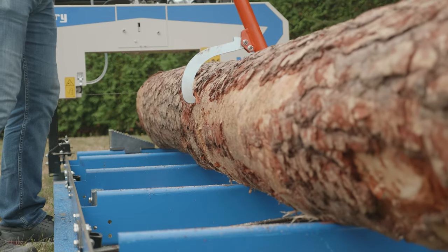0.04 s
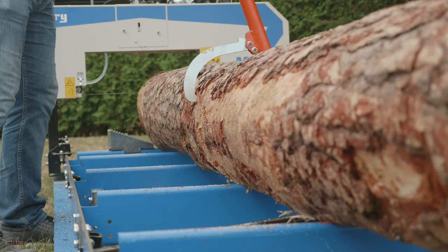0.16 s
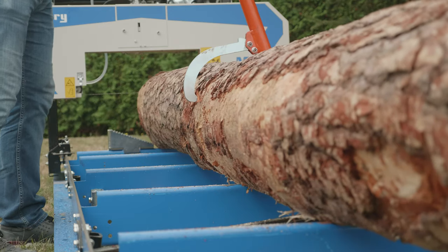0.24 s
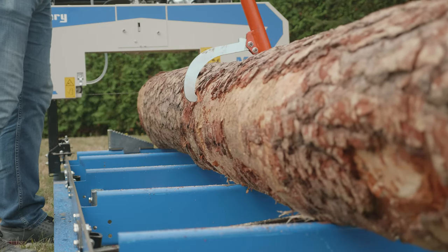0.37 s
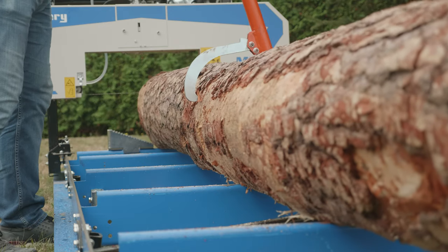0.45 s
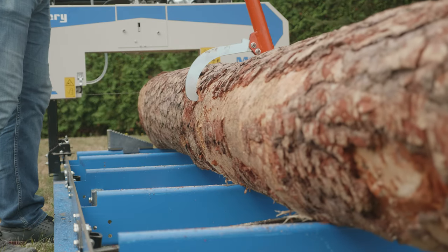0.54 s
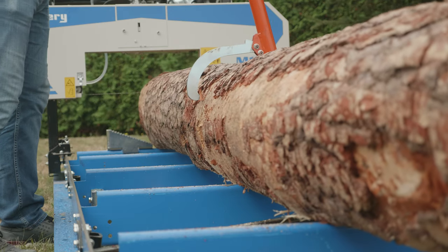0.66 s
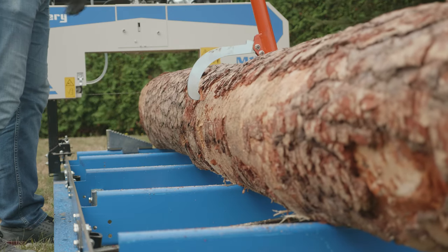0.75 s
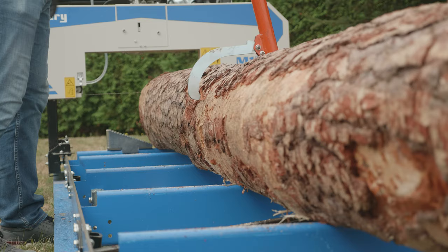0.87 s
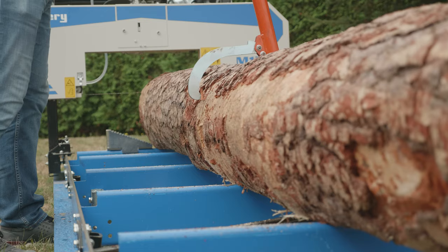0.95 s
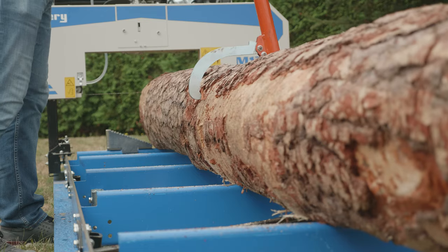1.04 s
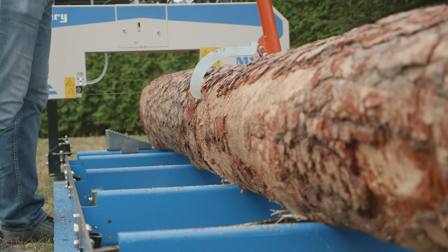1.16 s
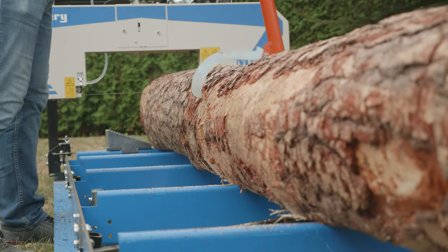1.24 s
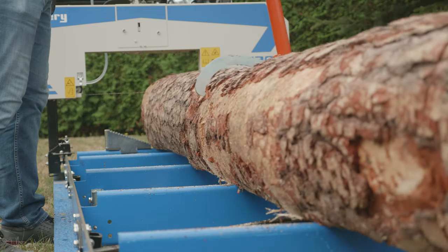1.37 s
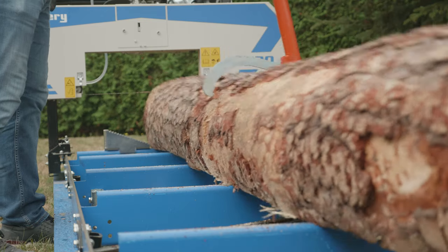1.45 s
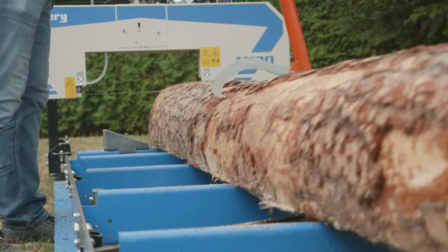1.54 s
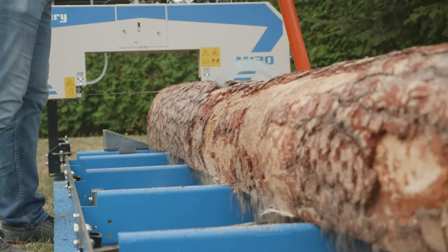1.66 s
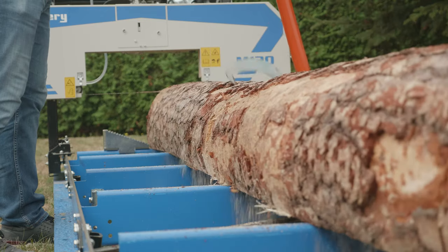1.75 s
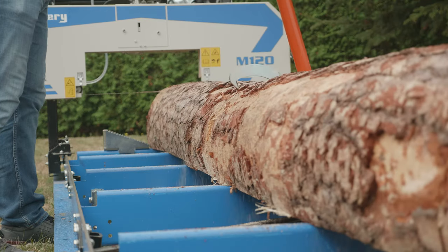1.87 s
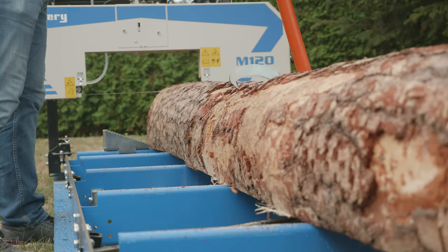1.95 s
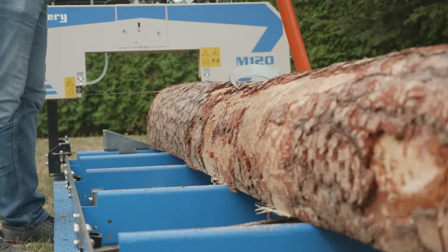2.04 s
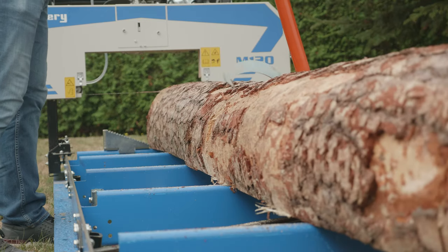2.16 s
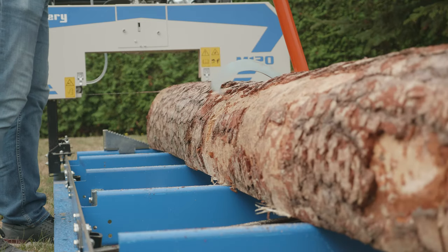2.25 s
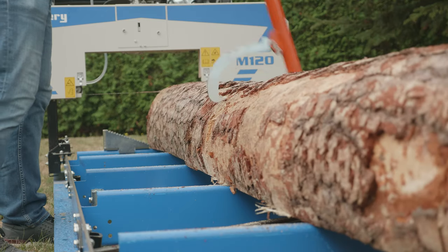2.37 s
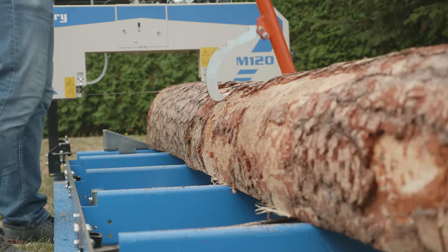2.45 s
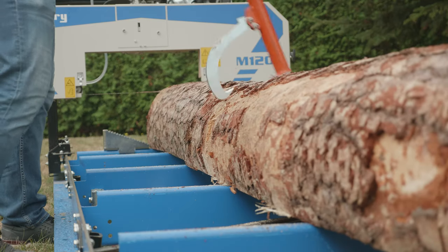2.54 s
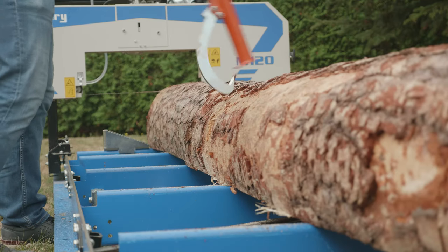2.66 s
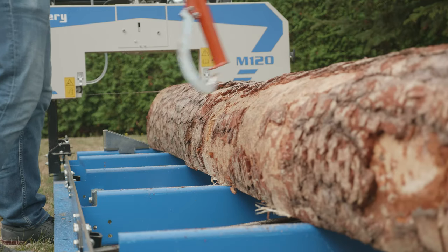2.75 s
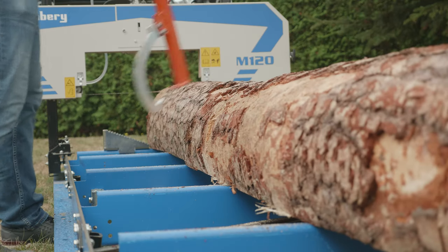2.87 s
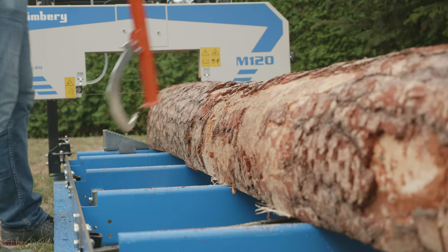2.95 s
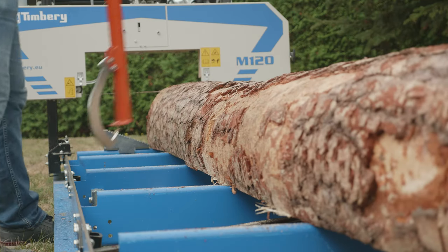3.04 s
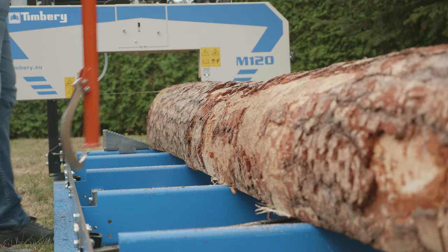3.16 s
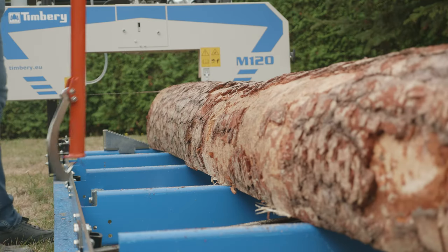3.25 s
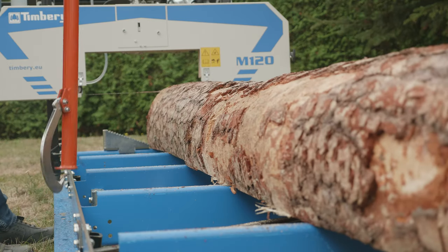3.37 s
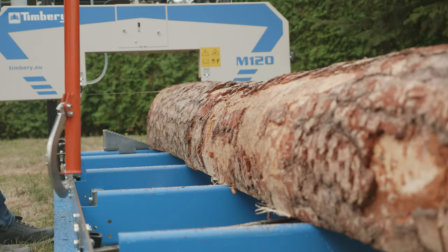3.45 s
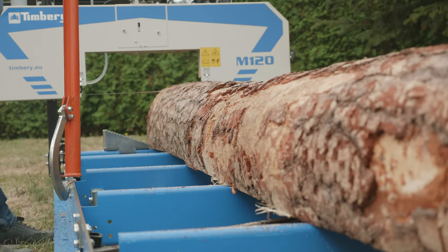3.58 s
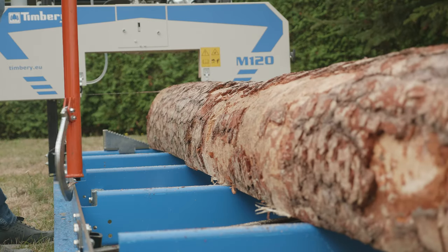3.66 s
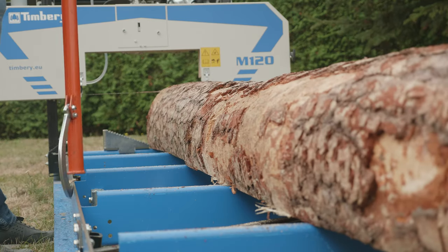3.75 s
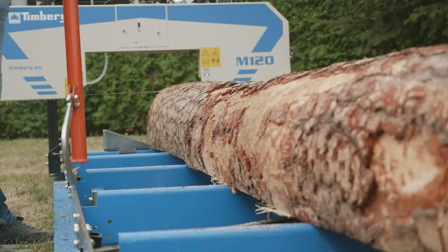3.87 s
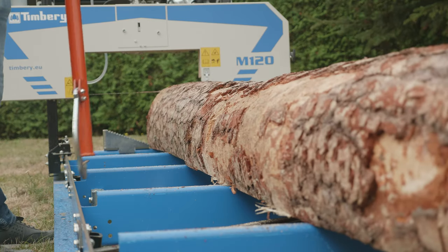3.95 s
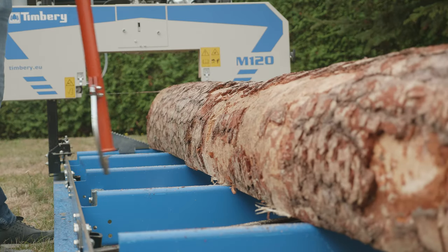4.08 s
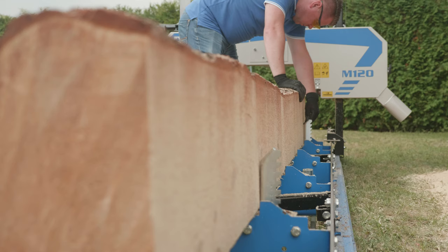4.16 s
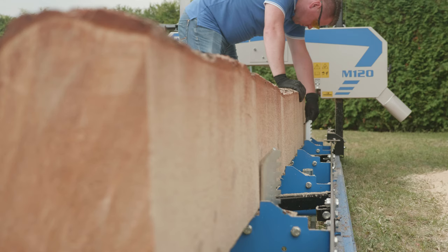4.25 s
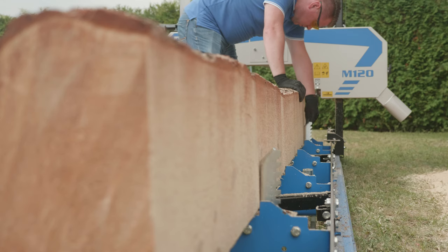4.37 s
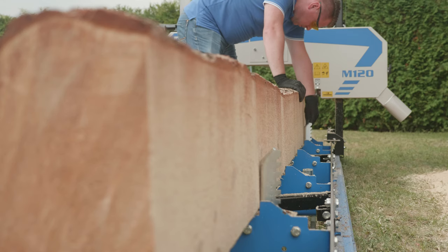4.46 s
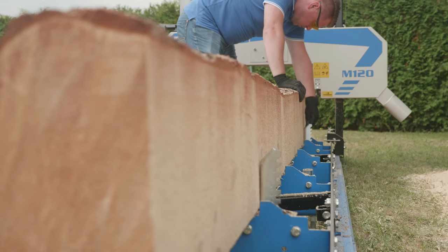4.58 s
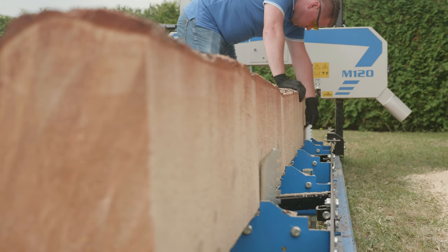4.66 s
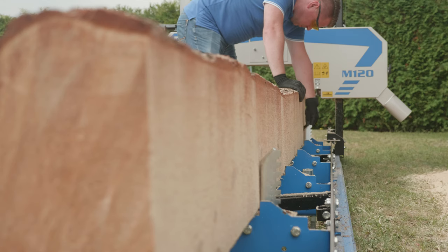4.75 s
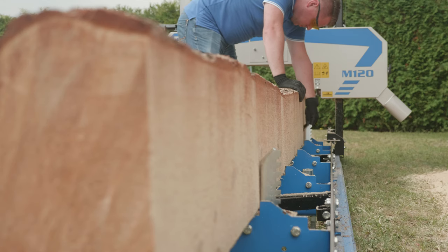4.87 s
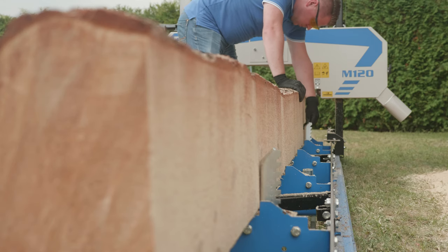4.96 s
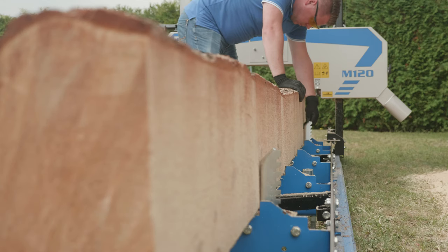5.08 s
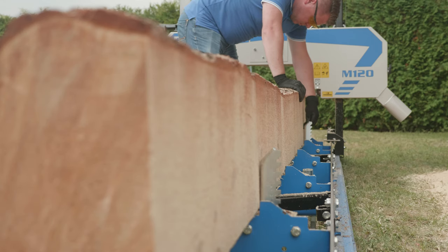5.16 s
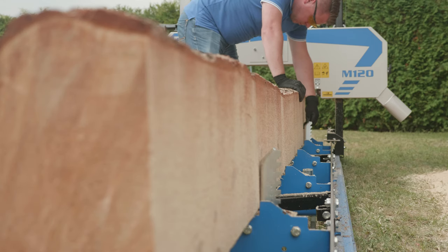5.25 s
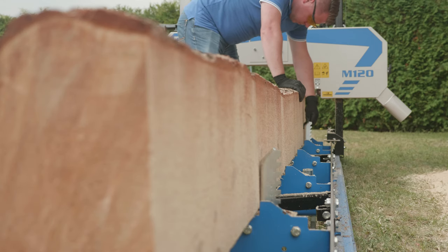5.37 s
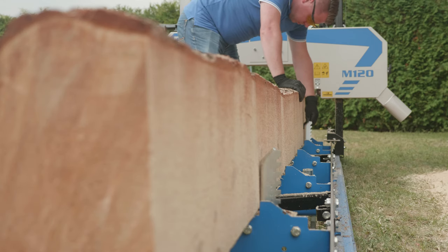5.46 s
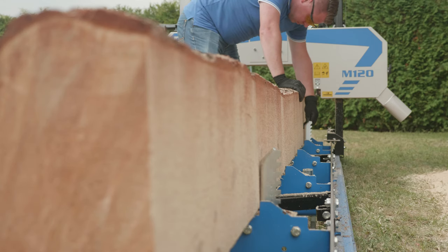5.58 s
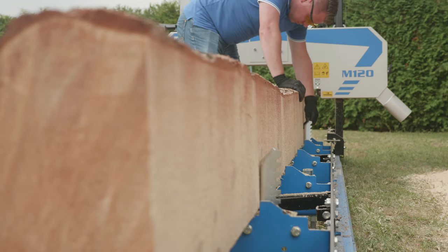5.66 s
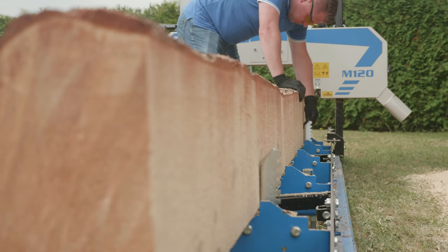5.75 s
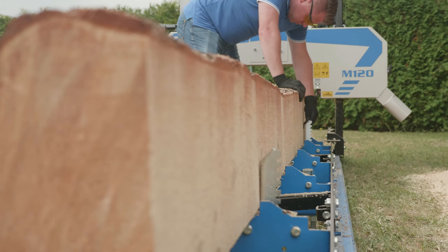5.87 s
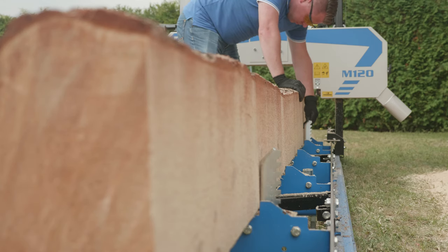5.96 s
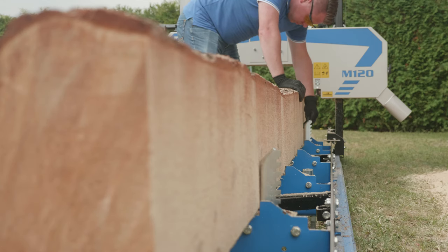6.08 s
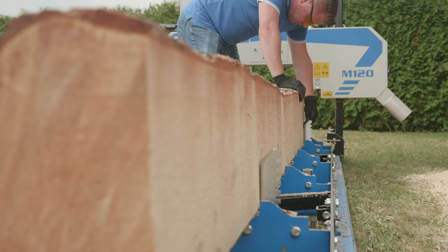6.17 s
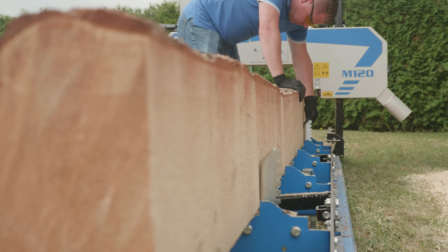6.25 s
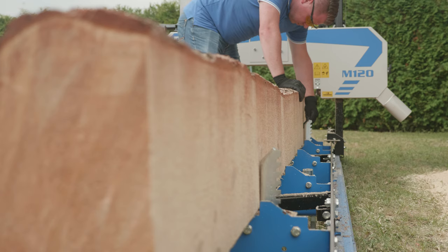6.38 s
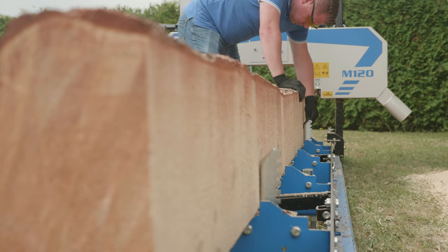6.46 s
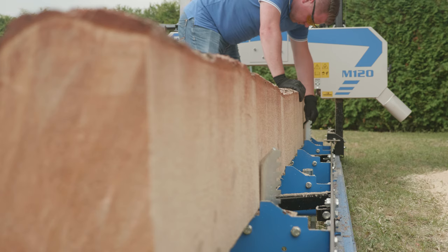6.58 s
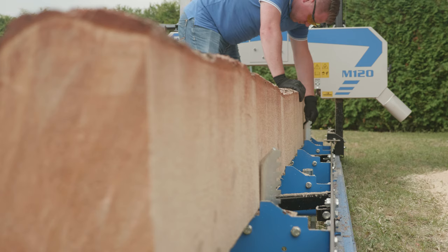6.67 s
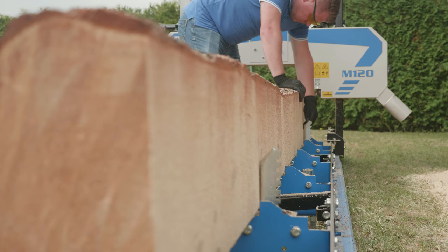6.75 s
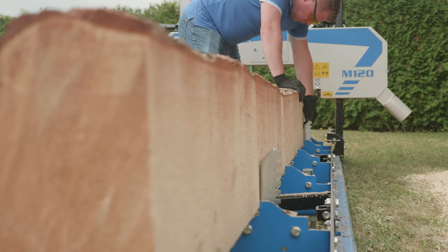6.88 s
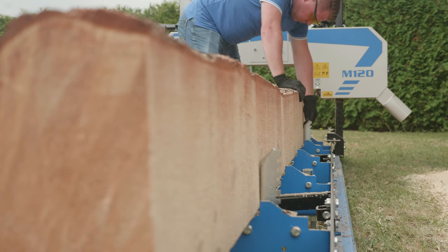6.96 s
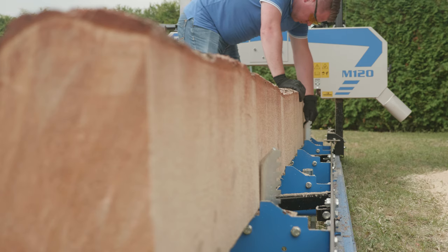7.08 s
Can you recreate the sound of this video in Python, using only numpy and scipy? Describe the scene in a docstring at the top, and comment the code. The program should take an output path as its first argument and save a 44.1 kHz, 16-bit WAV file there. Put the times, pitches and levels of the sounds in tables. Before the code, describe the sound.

Close outdoor microphone, quiet far traffic and leaves. After a second of calm a hook clinks, then a log slams onto steel beams with a loud bright clang, a short hum and grind and crumbs of bark pattering. The loose hook jingles high, the lever clanks onto a rail and rattles, then a clamp knocks softly against timber at uneven intervals, ending with one strong thud.

```python
"""Log turning on a sawmill bed

Outdoors at the steel bed, one microphone: the hinged hook of the turning lever clinks and rings, the log
drops on the cross beams and sheds bark, the lever is set on the rail, then a clamp is worked tight.
Struck parts are damped modes under a clatter of filtered noise; noise through beam modes hums when shaken.
Far off, shaped noise makes traffic and leaves; gliding sines make one bird call, and a slightly wavering
sine makes a faint whine in two spells.
"""
import sys
import numpy as np
from scipy import signal
from scipy.fft import rfft, irfft, next_fast_len
from scipy.io import wavfile
from scipy.ndimage import uniform_filter1d, map_coordinates

SR = 44100
rng = np.random.default_rng(int(sys.argv[2]) if len(sys.argv) > 2 else 0)


def generate_wav(signal):
    """Clip the signal to [-1, 1] and save it as 16-bit WAV at the path in sys.argv[1]."""
    frames = np.transpose(np.atleast_2d(signal))
    scaled = np.clip(frames, -1, 1) * 32767
    pcm = np.round(scaled).astype(np.int16)
    wavfile.write(sys.argv[1], SR, pcm)


N = 313992

# Far traffic and leaves, colour of each: f/Hz, density/dB per Hz (relative)
TRAFFIC_COLOUR = [(18, -38), (30, -2), (54, -0.5), (173, -11.5), (226, -8.5), (258, -15.5), (398, -26),
                  (500, -50), (650, -74.5), (1100, -120)]
LEAF_COLOUR = [(180, -32.5), (300, -4.5), (725, -12), (785, -8), (1040, -8), (1210, -6), (1330, -10),
               (4970, -24.5), (7000, -46), (9100, -62.5), (15400, -120)]
# Their course at the microphone: t/s, level/dB (the leaves before the gust is added)
TRAFFIC_COURSE = [(0, -51), (3.5, -53), (4.2, -47.5), (6.1, -48.5), (6.5, -43), (7.12, -42.5)]
LEAF_COURSE = [(0, -63.5), (3.5, -62.5), (4.2, -59.5), (6.1, -60.5), (6.5, -59), (7.12, -58)]
# Notes of the bird call: t/s, length/s, start f/Hz, end f/Hz, rms level at the crest/dB
BIRD_NOTES = [(0.332, 0.028, 4550, 3600, -67), (0.361, 0.018, 3700, 3530, -62.5)]
# Two spells of a faint far tone: t/s, length/s, rms level/dB
WHINE_SPELLS = [(4.593, 0.764, -63), (7.004, .3, -64)]
# The beams hum when shaken by hook, log or lever: t/s, shaking level/dB
BEAM_SHAKING = [(1.29, -50.5), (1.59, -48.5), (1.62, -33), (1.72, -24.5), (1.87, -29), (1.97, -39.5),
                (2.1, -41), (2.45, -48.5), (2.52, -42.5), (2.9, -43), (3.55, -59.5), (3.63, -43.5),
                (4.0, -46.5), (4.15, -68)]
# Bark shaken loose: t/s, level from which the patter fades/dB
BARK_SHOWERS = [(1.599, -55.5), (1.9, -74.5), (2.85, -69.5)]
# Heavier blows: t/s, level/dB, hardness as treble/dB, thud re blow/dB, clatter length factor
LOG_DROPS = [(1.534, -41, -61, -8.5, 0.43), (1.597, -5.5, -14, 9.5, 0.99), (1.617, -22, -46.5, -1, 1),
             (1.631, -11.5, -31, 1, 1.1), (1.679, -30, -21, 5, 1.5)]
RAIL_HITS = [(2.49, -27, -40, 17, 1.5), (3.588, -13, -26, -8.5, 0.97), (3.764, -25.5, -42.5, 1, 0.8),
             (3.789, -24.5, -31.5, -6, 1.8), (3.803, -27.5, -30, 2, 1.13), (3.86, -28, -41, -4, 2.3),
             (3.897, -26.5, -24, -2.5, 0.46), (3.907, -22.5, -34, -7.5, 0.93),
             (3.922, -26.5, -18, -8, 0.39), (3.939, -27, -26, -20, 0.66)]
CLAMP_HITS = [(4.239, -21.5, -52, -5.5, 1.35), (4.383, -28, -27.5, 5.5, 1.64), (4.39, -51.5, 8, -21, 0.65),
              (4.776, -31.5, -62, 5.5, 1.9), (4.978, -35.5, -28, -23.5, 1.8),
              (5.014, -24.5, -32, 8.5, 2.06), (5.098, -22.5, -43.5, -2, 1.94),
              (5.584, -40.5, -72, 2.5, 1.7), (5.931, -30, -55, -3, 1.32), (6.383, -22.5, -45.5, 4, 1.52),
              (6.499, -27, -59, -1, 1.77), (6.54, -29.5, -22, -3, 1), (6.683, -8, -29, -1, 1.59),
              (6.984, -36, -64.5, 3.5, 0.98)]
FAR_CLANG = [(5.519, -68, 0, -42, 14)]
# Hook swinging on its pivot: t/s, level/dB, hardness as treble/dB, hook ringing re blow/dB,
# pivot ringing re blow/dB, pivot treble/dB
HOOK_HITS = [(1.287, -27.5, -21.5, 3.5, -19.5, 35), (1.374, -61, 3, -15, -20, 0),
             (1.401, -26, 0.5, 9, -17, 4), (1.721, -18, -6, 6, -4, -2), (1.77, -25, -20, 3, -7, -4),
             (1.809, -22.5, -13, 0, 3, -26), (1.844, -30, -15, 6, 3, 7),
             (1.861, -24.5, -7, 13.5, 6.5, 13.5), (2.319, -49, -33, 3, 8, -19),
             (2.361, -36.5, -33, -9, -6, -11), (2.405, -40.5, -35, -4, -2, -17),
             (2.493, -38.5, 5, 8.5, 15.5, -18), (2.537, -63, 19, 13, -5, 23),
             (2.632, -32.5, -9.5, 12.5, 2, 19), (2.664, -34.5, -6.5, 9, 8.5, -23),
             (2.698, -37, -40, 8, 8, -6), (2.72, -42, -16, 7.5, 13.5, -14), (2.784, -30, -18, 4.5, 8, -9),
             (2.808, -21, -14.5, 3, -0.5, 9.5), (3.005, -33, -71, -12, -5.5, -20),
             (3.115, -36, -34, -10, -7, -9), (3.142, -29, -25, -10, -10, 28),
             (3.157, -38, -20, -4, -25, 15), (3.184, -31, -26, 5.5, -1.5, 35),
             (3.23, -41, -19, -12.5, -16, 10), (3.614, -22.5, -44, -8, -6, 0),
             (3.789, -45, -20, 4.5, 9.5, 9), (4.015, -30, -26.5, -13, -4.5, 10),
             (4.524, -36, -34, -35.5, -24, 10.5), (4.548, -40, -38, -14, -9, 7),
             (4.672, -34, -10, -7.5, 2, -18)]
# The hook is pressed into wood or a glove and stops ringing: t/s
HOOK_GRIPS = [1.6, 2.691, 3.88, 4.119, 4.725]
# Modes of the beams humming under the load: f/Hz, level/dB (relative), t60/s
BEAM_MODES = [(60, -10, .15), (117, -1, .07), (170, -7, .09), (245, 2, .22), (295, -6, .12)]
# Bodies that thud, same columns: bed, frame under the rail, timber
BED_MODES = [(58, -14, .4), (108, -12, .35), (145, -12, .3), (172, -9, .2), (232, -9, .25), (256, -7, .2),
             (293, 0, .18), (345, -8, .1), (450, 2, .06), (525, 2, .06), (600, 0, .055)]
FRAME_MODES = [(105, -12, .45), (252, -4, .45), (272, 4, .08), (392, -14, .13), (520, -7, .13)]
TIMBER_MODES = [(215.3, -8, .25), (241.5, -8, 0.27), (283.3, -6, 0.32), (345, -2, 0.15),
                (453.7, 3.5, 0.084), (540, -4, 0.058)]
# Struck parts that ring, same columns: rail, clamp, sheet, loose pivot, hook
RAIL_MODES = [(964, -8, .13), (1127, -2, .18), (1217, -3, .18), (1470, 0, .13), (1766, -3, .15),
              (2010, -2, .15), (2229, -5, .16), (2412, -3, .17), (2620, -8, .12), (2815, -7, .14),
              (3050, -6, .19), (3250, -8, .13), (3680, -13, .1)]
CLAMP_MODES = [(930, -9, .17), (1160, -10, .33), (1455, 0, .16), (1503, -4, .16), (1620, -8, .18),
               (1745, -10, .15), (2075, -12, .16), (2258, -11, .15), (2625, -13, .14), (2810, -14, .25),
               (3520, -12, .3), (4150, -18, .1), (4732, -18, .1), (6500, -20, .13), (7310, -22, .12),
               (9155, -28, .14)]
SHEET_MODES = [(2853, -12, .7), (3488, -12, .6), (4172, -5, .6), (4090, -8, .5), (4527, -7, .5),
               (7321, -7, .55), (8796, -11, .45)]
PIVOT_MODES = [(780, -2, .13), (1310, -1, .15), (1870, -8, .08), (2440, -3, .06), (2650, -1, .05),
               (2934, -6, .07), (3340, -1, .06), (4064, -8, .05)]
HOOK_MODES = [(4473, -11, .6), (4503, -9, .6), (4542, -6, .4), (4600, -6, .17), (5172, -9, .22),
              (5466, -13, .17), (4640, -1, .09), (4710, -3, .11), (4830, -7, .1), (5790, -16, .09),
              (6295, -22, .1), (7630, -16, .13), (9065, -26, .1), (12620, -29, .17), (12690, -28, .15),
              (12775, -29, .17), (12900, -26, .1)]
# Clatter of bolted steel at its usual hardness: f/Hz, density/dB per Hz (relative)
CLATTER_COLOUR = [(150, -15.5), (350, -1), (750, -4), (1300, -1), (3000, 2), (6000, -8), (15000, -31)]
# Its decay at length factor 1: f/Hz, t60/s
CLATTER_DECAY = [(300, 0.17), (1500, 0.13), (4000, 0.073), (12000, 0.059)]

HISS_DB, WHINE_HZ = -78.5, 1257  # the whine wavers around this pitch
GUST_S, GUST_WIDTH_S, GUST_DB = 0.15, 0.081, 5
GRIND_DB, GRIND_POWER = -32, 1.35  # grinding at the strongest shaking; it fades faster than the hum
SHOWER_RISE_S, SHOWER_FADE_DB_PER_S = 0.18, 35.5
BEAT_START_S, BEAT_PERIOD_S = 2.088, .0355  # the patter comes in beats
USUAL_TREBLE_DB = -18  # hardness at which the clatter keeps its colour
CLATTER_LIFT_DB, HOOK_CLATTER_LIFT_DB, HOOK_LENGTH = 5, 1.5, 0.88  # the last is a clatter length factor
RING_PER_HARDNESS = 0.24  # a harder contact rings the part more (dB per dB)
BRIGHT_PER_HARDNESS = 0.3  # and favours its high modes (dB per dB)
TIGHT_T60_S = .2  # modes that ring longer than this are shaken less by loose joints
ECHO_DB, ECHO_T60_S, ECHO_DELAY_S = -14, .2, .008
FULL_SCALE, TOP_HZ = .97, 16000  # ceiling and band limit of the input stage


def amp(db):
    """Gain of a level in dB."""
    return 10 ** (np.asarray(db) / 20)


def unit(x):
    """x at rms 1."""
    return x / np.sqrt(np.mean(x ** 2) + 1e-20)


def along(points, hz):
    """Reads (f/Hz, value) points on a log frequency axis."""
    f, value = np.transpose(points)
    return np.interp(np.log(hz + 1), np.log(f + 1), value)


def course(rows):
    """Gain per sample from (t/s, level/dB) rows, silent outside their span."""
    t = np.arange(N) / SR
    s, db = np.transpose(rows)
    return amp(np.interp(t, s, db)) * (t > s[0]) * (t < s[-1])


def wobble(rate):
    """A smooth random curve, rate knots a second."""
    knots = rng.standard_normal(int(N * rate / SR) + 4)
    return map_coordinates(knots, [np.arange(N) * rate / SR])


def coloured(x, spectrum):
    """x through a (f/Hz, gain/dB) spectrum, at rms 1."""
    m = next_fast_len(N + SR // 2)
    gain = amp(along(spectrum, np.fft.rfftfreq(m, 1 / SR)))
    return unit(irfft(rfft(x, m) * gain, m)[:N])


def add(out, s, sound):
    """Mixes a sound in at s seconds."""
    part = out[round(s * SR):][:len(sound)]
    part += sound[:len(part)]


def background():
    """Lumpy far traffic, patchy leaves with one gust and the steady hiss of the microphone."""
    traffic = coloured(rng.standard_normal(N) * amp(1.3 * wobble(3.3)), TRAFFIC_COLOUR)
    # each patch of leaves covers neighbouring frequencies and moments
    z = signal.stft(rng.standard_normal(N + 512), nperseg=512)[2]
    field = uniform_filter1d(rng.standard_normal(z.shape), 6, axis=0)
    field = uniform_filter1d(field, 14, axis=1)
    patchy = signal.istft(z * amp(1.1 * unit(field)), nperseg=512)[1][:N]
    leaves = coloured(patchy, LEAF_COLOUR)
    gust = amp(GUST_DB * np.exp(-((np.arange(N) / SR - GUST_S) / GUST_WIDTH_S) ** 2))
    hiss = coloured(rng.standard_normal(N), [(3000, -13.0), (6000, 1.5), (16000, 0.0)])
    return course(TRAFFIC_COURSE) * traffic + course(LEAF_COURSE) * gust * leaves + amp(HISS_DB) * hiss


def bird():
    """A call of two short notes, each a sine gliding in pitch under a rounded swell."""
    out = np.zeros(N)
    for s, length, from_hz, to_hz, db in BIRD_NOTES:
        u = np.arange(round(length * SR)) / (length * SR)
        phase = 2 * np.pi * np.cumsum(from_hz + (to_hz - from_hz) * u) / SR
        add(out, s, np.sqrt(2) * amp(db) * np.sin(np.pi * u) * np.sin(phase))
    return out


def whine():
    """A faint far sine in two spells, its pitch wavering slightly."""
    t, level = np.arange(N) / SR, np.zeros(N)
    for s, length, db in WHINE_SPELLS:
        to_edge = np.minimum(t - s, s + length - t)
        level += amp(db) * np.clip(to_edge / 0.019, 0, 1)
    phase = 2 * np.pi * np.cumsum(WHINE_HZ + 3 * wobble(38)) / SR
    return np.sqrt(2) * level * np.sin(phase)


def hardness(hz, treble_db):
    """A soft contact drives the high modes less."""
    return treble_db * np.clip(np.log2(hz / 1200 + 1e-9) / 3, 0, 1.2)


def ring(modes, t, scatter_db, treble_db=0, flutter_db=1.5, wander=0, swell=0.11):
    """Damped modes at random strengths and phases; loose joints shake level/dB and phase (wander/rad)."""
    hz, level, t60 = np.transpose(modes)[:, :, None]
    loose = np.minimum(1, TIGHT_T60_S / t60)

    def shake(rate):
        """One random curve per mode, rate knots a second."""
        knots = rng.standard_normal((len(modes), 80))
        return loose * np.array([np.interp(t * rate, np.arange(80), k) for k in knots])

    db = level + hardness(hz, treble_db) + scatter_db * rng.standard_normal(hz.shape)
    db = db + flutter_db * shake(64)
    phase = 2 * np.pi * (hz * t + rng.random(hz.shape)) + wander * shake(90)
    waves = amp(db - 60 * t / t60) * np.sin(phase)
    waves = waves * (1 - np.exp(-hz * t / swell))  # swell: cycles a mode takes to build up
    return 2 * np.sum(waves, axis=0) / np.sum(amp(level))


def clatter(t, treble_db, length):
    """The countless short modes of bolted steel: noise with a peaky spectrum, each band with its own decay."""
    white = rfft(rng.standard_normal(len(t)))
    lumps = unit(uniform_filter1d(rng.standard_normal(len(white)), size=40))
    peaky = unit(irfft(white * amp(3.5 * lumps), len(t)))
    hz, frames, z = signal.stft(peaky, SR, nperseg=256)
    decay = -60 * frames / (length * along(CLATTER_DECAY, hz)[:, None])
    colour = along(CLATTER_COLOUR, hz) + hardness(hz, treble_db - USUAL_TREBLE_DB)
    return signal.istft(z * amp(colour[:, None] + decay), SR, nperseg=256)[1][:len(t)]


def shaken_beams():
    """Shaken beams hum and grind under the load; bark crumbs patter on the steel."""
    t = np.arange(N) / SR
    shaking = course(BEAM_SHAKING)
    hum_response = ring(BEAM_MODES, np.arange(SR // 4) / SR, scatter_db=0, flutter_db=2.5)
    hum = signal.fftconvolve(rng.standard_normal(N), hum_response)[:N]
    hum = coloured(hum, [(340, 0), (3000, -36)])

    uneven = rng.standard_normal(N) * amp(3.5 * wobble(120) + 4.5 * wobble(35))
    grit = coloured(uneven, [(200, -24), (450, -3), (1300, -3), (3500, -11), (8000, -34), (16000, -46)])
    grind = amp(GRIND_DB) * (shaking / shaking.max()) ** GRIND_POWER

    patter = np.zeros(N)
    for s, db in BARK_SHOWERS:
        age = np.clip(t - s, 0, None)
        patter += amp(db - SHOWER_FADE_DB_PER_S * age) * np.clip(age / SHOWER_RISE_S, 0, 1)
    # position within an uneven beat, 0 to 1
    since_beat = ((t - BEAT_START_S) / BEAT_PERIOD_S + .06 * wobble(15)) % 1
    ticks = rng.standard_normal(N) * amp(4 * wobble(20) + 3 * wobble(900) - 15 * since_beat)
    crumbs = coloured(ticks, [(3000, -34.5), (6000, 2), (11000, -7.5), (16000, -18.5)])
    return shaking * hum + grind * grit + patter * crumbs


def blows(hits, part, body, ring_db, bright_db, rise_s, swell):
    """Each blow rattles, rings the struck part and thuds through the body under it."""
    out, t = np.zeros(N), np.arange(SR * 3 // 5) / SR
    onset = 1 - np.exp(-(t / rise_s) ** 2)  # a soft contact builds up over some ms
    for s, db, treble_db, thud_db, length in hits:
        rattle = amp(CLATTER_LIFT_DB) * clatter(t, treble_db, length)
        thud = amp(thud_db) * ring(body, t, scatter_db=1.5, wander=.3, swell=swell)
        part_treble_db = bright_db + BRIGHT_PER_HARDNESS * treble_db
        ringing = ring(part, t, scatter_db=2.5, treble_db=part_treble_db, flutter_db=2.5, wander=0.51)
        ringing = amp(ring_db + RING_PER_HARDNESS * treble_db) * ringing
        add(out, s - rise_s / 2, amp(db) * onset * (rattle + thud + ringing))
    return out


def clamp():
    """The clamp is worked against timber, its slow contacts thudding; one faint sheet clang joins from afar."""
    work = blows(CLAMP_HITS, CLAMP_MODES, TIMBER_MODES, ring_db=4.5, bright_db=7, rise_s=.011, swell=4.5)
    clang = blows(FAR_CLANG, SHEET_MODES, TIMBER_MODES, ring_db=16, bright_db=-4, rise_s=.008, swell=1)
    return work + clang


def bed():
    """The log drops quickly excite rail and bed; the lever set on the rail thuds through its frame."""
    drops = blows(LOG_DROPS, RAIL_MODES, BED_MODES, ring_db=-1, bright_db=-8, rise_s=.0032, swell=.5)
    lever = blows(RAIL_HITS, RAIL_MODES, FRAME_MODES, ring_db=4, bright_db=6, rise_s=.0062, swell=1.2)
    return drops + lever


def hook():
    """The hook rings long and high until gripped, its loose pivot short and lower."""
    out, t = np.zeros(N), np.arange(SR * 4 // 5) / SR
    for s, db, treble_db, hook_db, pivot_db, pivot_treble_db in HOOK_HITS:
        free_s = min([grip - s for grip in HOOK_GRIPS if grip > s] + [1])
        held = amp(-60 * np.clip(t - free_s, 0, None) / 0.026)
        rattle = amp(HOOK_CLATTER_LIFT_DB) * clatter(t, treble_db, HOOK_LENGTH)
        pivot = ring(PIVOT_MODES, t, scatter_db=2.5, treble_db=pivot_treble_db, wander=1.0)
        ringing = ring(HOOK_MODES, t, scatter_db=3.5, treble_db=4 + treble_db / 4, flutter_db=3.5, wander=.9)
        sound = rattle + amp(pivot_db) * pivot + amp(hook_db) * ringing * held
        add(out, s, amp(db) * (1 - np.exp(-t / 0.001)) * sound)
    return out


def echoes(x):
    """The machine frame and the hedge answer: a short decaying noise tail after a small delay."""
    t = np.arange(SR // 3) / SR
    tail = rng.standard_normal(len(t)) * amp(-60 * t / ECHO_T60_S) * (t > ECHO_DELAY_S)
    return x + amp(ECHO_DB) * signal.fftconvolve(x, tail / np.linalg.norm(tail))[:N]


def scene():
    """Everything reaches one microphone in the open air; only the blows are echoed."""
    far = background() + bird() + whine()
    near = shaken_beams() + echoes(clamp() + bed() + hook())
    return (far + near)[None]


def record(dry):
    """The input stage rounds off the loudest peaks and keeps nothing above its band limit."""
    m = next_fast_len(N + SR // 2)
    rounded = dry / (1 + np.abs(dry / FULL_SCALE) ** 4) ** (1 / 4)
    passed = np.fft.rfftfreq(m, 1 / SR) < TOP_HZ
    return irfft(rfft(rounded, m) * passed, m)[:, :N]


dry = scene()
out = record(dry)
generate_wav(out)
```